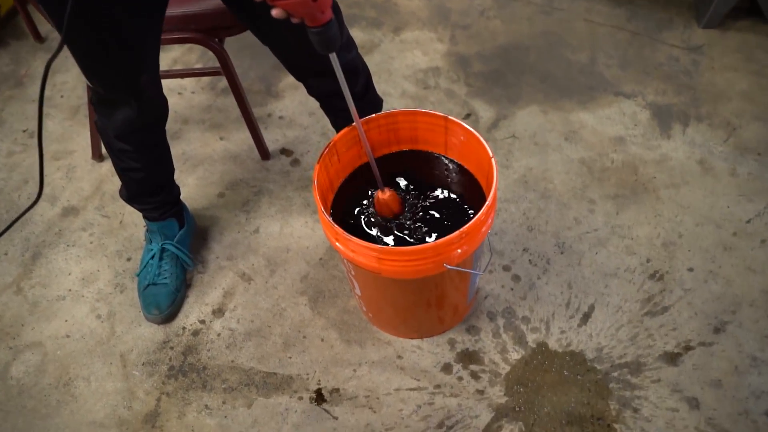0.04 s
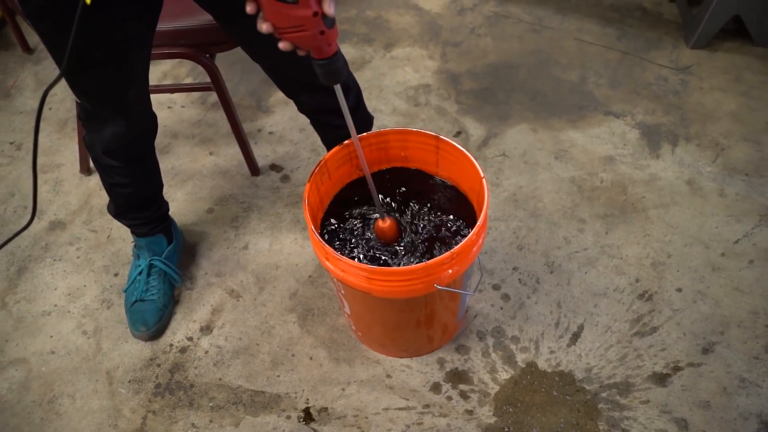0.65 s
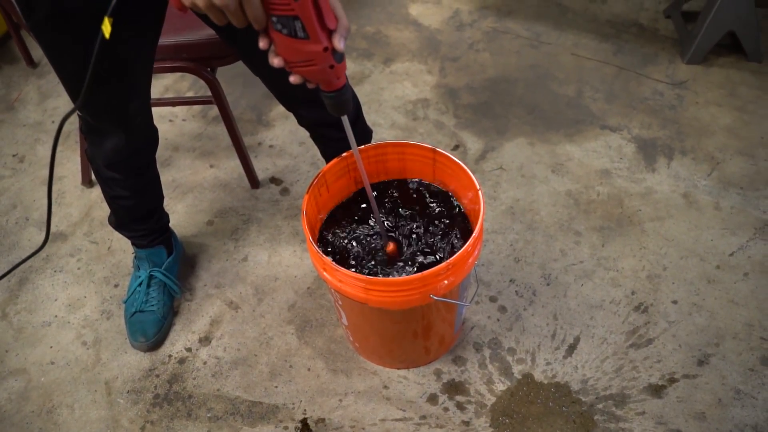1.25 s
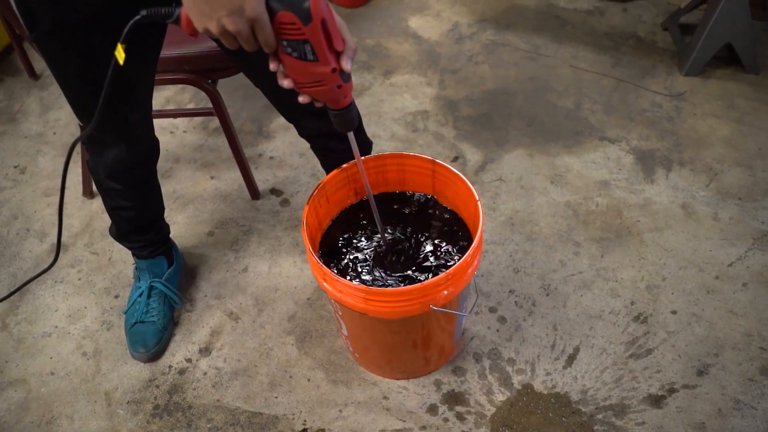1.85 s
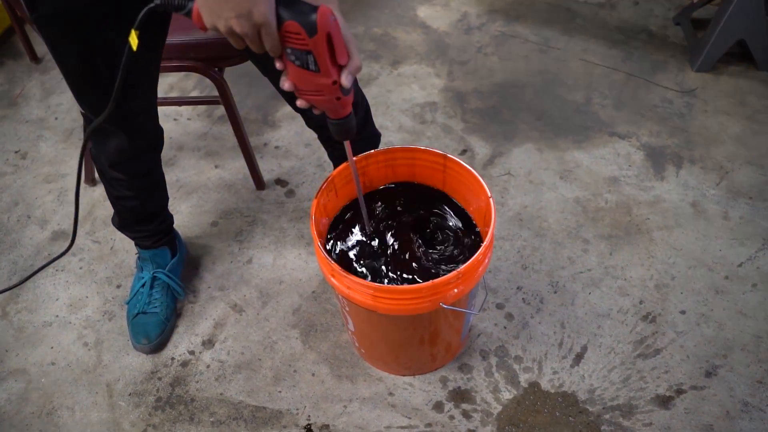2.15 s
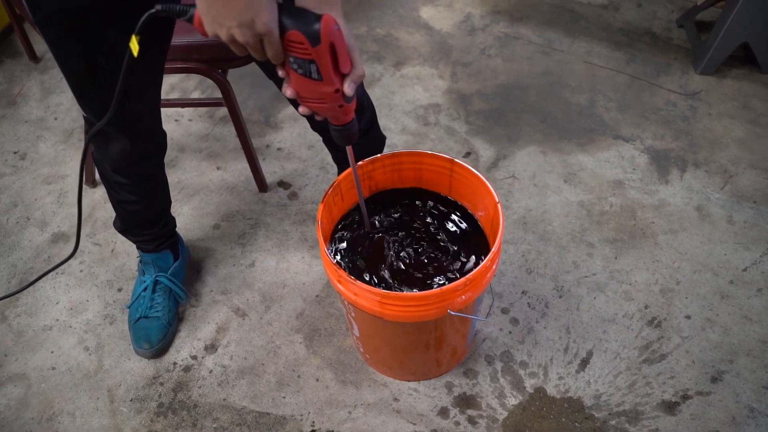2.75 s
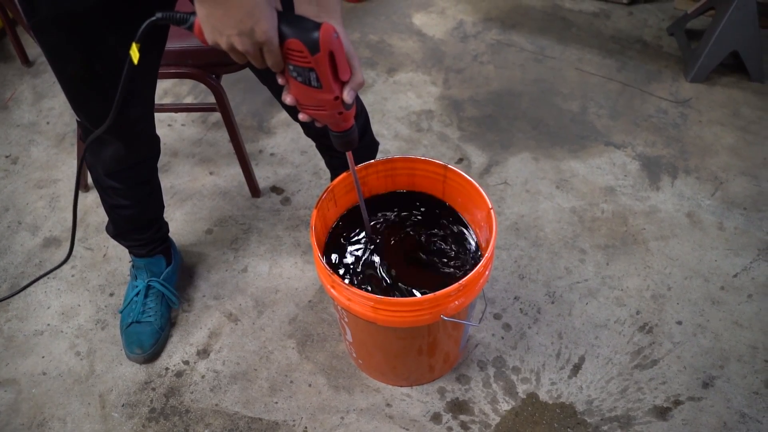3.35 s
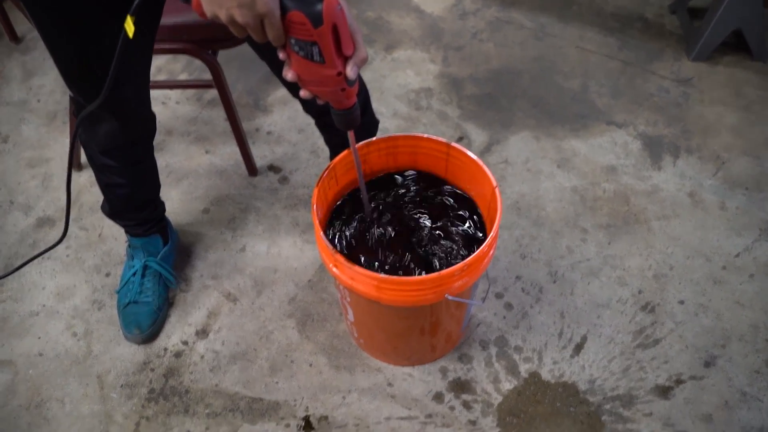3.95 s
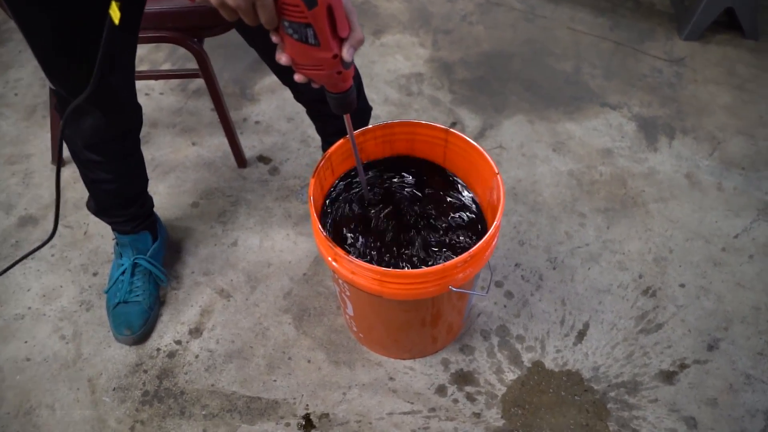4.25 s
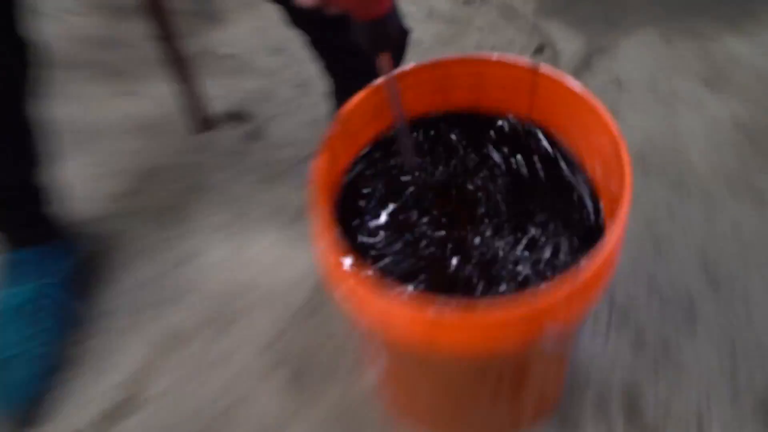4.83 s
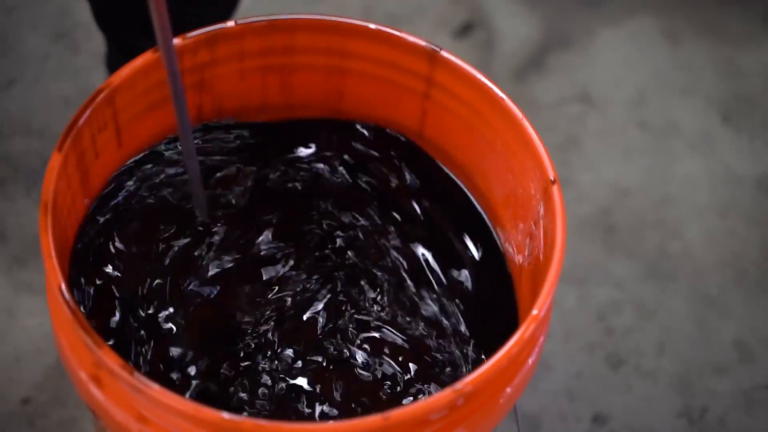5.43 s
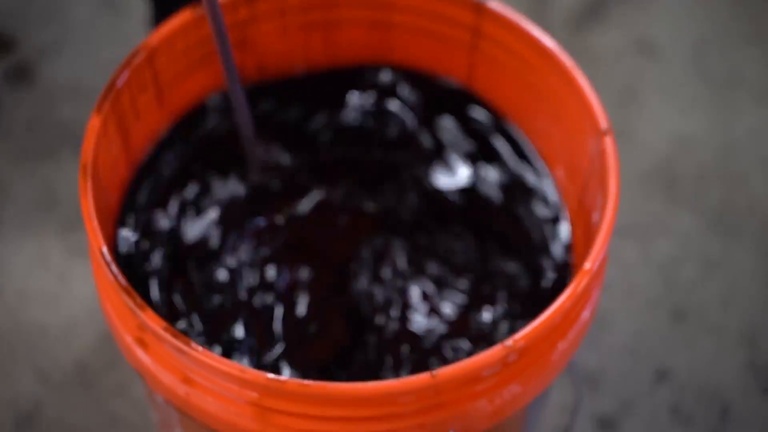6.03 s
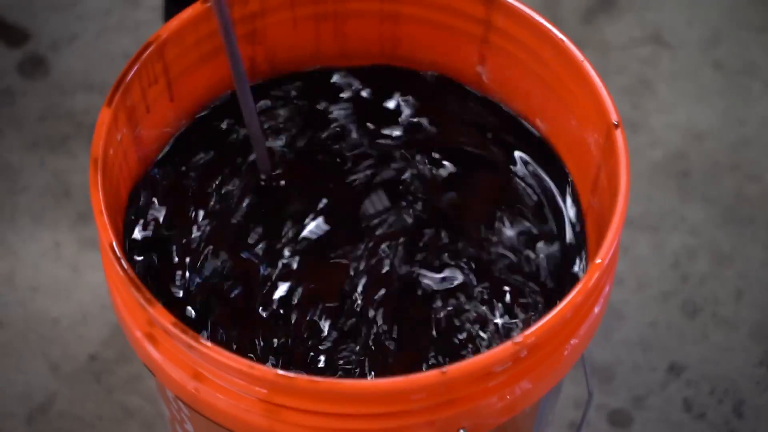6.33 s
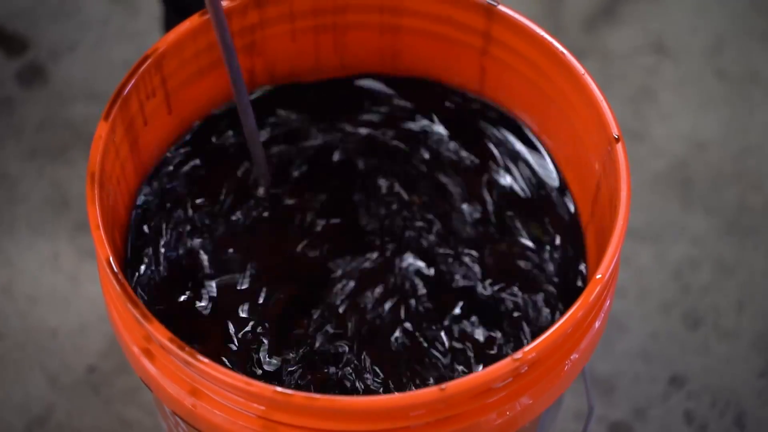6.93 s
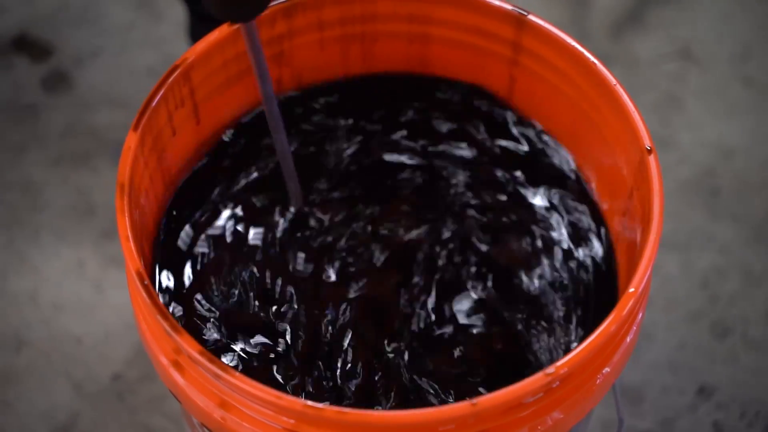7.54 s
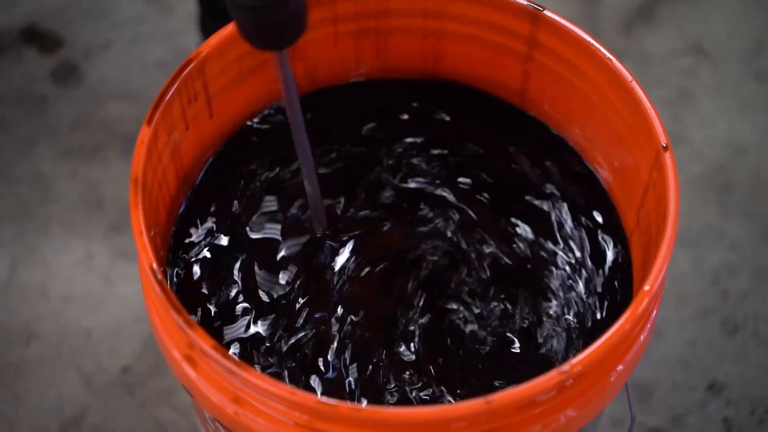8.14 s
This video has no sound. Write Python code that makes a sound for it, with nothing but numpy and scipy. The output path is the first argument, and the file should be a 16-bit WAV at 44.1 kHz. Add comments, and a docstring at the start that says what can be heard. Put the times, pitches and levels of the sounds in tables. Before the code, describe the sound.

Over a low workshop drone, an electric drill whirs at low speed, churning bubbles at the surface of a bucket of liquid. The paddle sinks and the swirl gulps air. The sound then cuts to a faster, louder, brighter whine that wavers in pitch above light frothing. Past the middle the microphone comes closer, with a gulp, a soft handling bump and a brief knock, and the drill keeps running.

```python
"""A corded drill spins a mixing paddle in a plastic bucket of thick liquid, over a low workshop drone.
It starts slowly: gears and motor whine over brush hiss, and the paddle churns bubbles at the surface.
By 1.4 s the paddle sinks and the vortex gulps air. At 2.2 s the sound cuts abruptly to the drill
running faster and louder; it sags and rises with the load. Near 5 s the microphone moves in
over the bucket, with a last gulp, a soft bump and a short knock."""
import sys
import numpy as np
from scipy import signal
from scipy.fft import rfft, irfft, next_fast_len
from scipy.io import wavfile
from scipy.ndimage import uniform_filter1d, map_coordinates

SR = 44100
rng = np.random.default_rng(int(sys.argv[2]) if len(sys.argv) > 2 else 0)


def wrap_up_sound(samples):
    """Save the sound to the file named by the first command line argument, as 16-bit audio."""
    columns = np.atleast_2d(samples).T
    # keep every value between -1 and 1, then stretch to whole-number steps
    tamed = np.clip(columns, -1, 1)
    steps = np.round(tamed * 32767).astype(np.int16)
    wavfile.write(sys.argv[1], SR, steps)


N = 360826
TIME = np.arange(N) / SR
LAYSHAFT_RATIO, PADDLE_RATIO = .228, .0262  # turns per rotor turn
MAINS_HZ, WORKING_HZ = 60, 400

# room drone: f/Hz, relative level/dB
DRONE_SPECTRUM = [(20, -32), (45, -10), (66, -17), (80, 4.5), (90, -8.5), (105, -10.5), (170, -26),
                  (400, -8), (1500, -66)]
# room drone: t/s, relative level/dB
DRONE_ENVELOPE = [(0.0, -57), (1.23, -49.5), (2.44, -57), (2.89, -50), (3.96, -49.5), (4.88, -56.5),
                  (5.6, -64), (5.76, -49), (6.38, -45.5), (6.74, -59), (7.29, -52), (8.18, -55)]
# room field: f/Hz, left-right correlation
STEREO_CORRELATION = [(60, 1), (250, 0.99), (700, 0.96), (1400, 0.89), (2800, 0.66), (5600, 0.9),
                      (9000, 0.25), (14000, 0.37)]
# channel balance: f/Hz, left minus right/dB
STEREO_BALANCE = [(60, 0), (400, 0.2), (1200, -1), (2400, -1), (5000, -1.3), (10000, -1.2), (15000, 1.5)]
# blows on the microphone body: t/s, level before low cut/dB, f/Hz, t60/s
MIC_BUMPS = [(4.67, -27, 90, 0.036), (5.193, -7, 193, 0.012)]
# four high droplet ticks, and a short knock with the bump at 5.2 s: t/s, level/dB, f/Hz, t60/s
TICKS_AND_KNOCK = [(.55, -32, 10500, .03), (1.305, -25, 12400, 0.022), (4.43, -20, 13800, 0.013),
                   (4.72, -28, 12800, .01), (5.185, -16, 860, 0.031)]
# big air pockets in the vortex: f/Hz, relative level/dB
SLOSH_SPECTRUM = [(190, -16), (250, -9), (310, -7), (400, 5)]
# vortex gulps: centre t/s, length/s, lift/dB
VORTEX_GULPS = [(1.274, 1, 13), (2.124, 0.33, 9), (4.985, 0.78, 12.5)]
# bubbles churned in by the blades: f/Hz, relative level/dB
CHURN_SPECTRUM = [(420, -28), (520, -2.5), (605, -4.5), (660, 2), (750, -27.5), (850, -34)]
# splashes and bursting froth: f/Hz, relative level/dB
FROTH_SPECTRUM = [(750, 6), (1100, 0.5), (1600, -1), (3000, -6.5), (6000, -22)]
# rotor speed under load, slow run: t/s, f/Hz
SLOW_SPEED = [(0.0, 173.2), (0.03, 183.6), (0.23, 218.2), (0.52, 241.9), (1.07, 251.4), (1.12, 247.0),
              (1.36, 204.9), (1.78, 249.3), (2.15, 270.1)]
# rotor speed under load, fast run: t/s, f/Hz
FAST_SPEED = [(2.19, 388.6), (2.29, 370.2), (2.46, 357.5), (2.65, 366.7), (3.11, 431.7), (3.81, 477.8),
              (3.94, 480.1), (4.44, 423.7), (4.83, 414.3), (4.96, 384.8), (5.39, 383.8), (5.63, 406.3),
              (6.29, 424.0), (6.41, 420.0), (6.69, 396.0), (7.06, 413.0), (7.23, 394.7), (7.48, 388.6),
              (8.0, 412.9), (8.18, 394.2)]
# once-a-turn hum, fast run: t/s, relative level/dB
HUM_ENVELOPE = [(2.25, -48), (2.31, -37), (4.3, -33), (4.61, -44), (4.73, -38), (5.09, -40.5), (5.6, -34),
                (6.03, -44.5), (6.31, -32.5), (6.39, -40), (6.84, -30.5), (7.01, -34.5), (7.27, -30.5),
                (8.11, -32.5), (8.18, -43)]
# gear, slot and commutator tones: rotor order, relative level/dB, sideband depth, roughness
WHINE_ORDERS = [(3, -28, .5, .3), (4, -17, .5, .15), (5, -21, .9, .3), (6, -21, .8, .25), (7, -28, 1, .5),
                (8, -26, .8, .25), (9, -25.5, .6, .3), (11, -28, .8, .4), (12, -18.6, .45, .2),
                (15, -26.5, .7, .9), (16, -30, .7, .9), (18, -21.5, .6, .3), (19, -32, 1, 1.2),
                (23.5, -30, 1.3, 1.5), (24, -23.8, 1.0, .5), (30, -24, .7, .3), (34, -28, 1.2, .6),
                (36, -24.5, 1.0, .4), (42, -26, 1, .6)]
# housing radiation: f/Hz, relative level/dB
HOUSING_SPECTRUM = [(120, -27), (300, -16.5), (600, -14.5), (1250, -12.5), (1500, -7.5), (1800, -0.5),
                    (2800, 0.5), (3900, -2), (5000, -1.5), (6050, -2), (6600, -8.5), (9900, -9.5),
                    (11800, -18), (15800, -24.5)]
# housing and bucket resonances: f/Hz, width/Hz, far lift/dB, near lift/dB
HOUSING_MODES = [(910, 270, 8, 8.5), (1446, 32, 9, 8), (1735, 34, 4.5, 2), (1915, 54, 4, 0.5),
                 (2060, 204, 6.5, 4), (2140, 150, -3, -3), (2290, 57, 5.5, 0.5), (2590, 74, 3.5, 4.5),
                 (3170, 66, 3.5, 5), (3360, 230, 2.5, -1.5), (3457, 21, 10.5, 11), (4390, 750, 5, 4),
                 (5265, 155, 4.5, 4.5), (5660, 340, 5, -1), (5850, 470, 2.5, 8.5), (7080, 260, 0, 3.5),
                 (8500, 1550, 3.5, 3), (9360, 410, -2, 1), (10400, 990, 3, 0), (13800, 3200, 8.5, 4.5)]


def from_db(db):
    """Decibels to gain."""
    return 10 ** (np.asarray(db) / 20)


def rms_one(x):
    """Scale to unit rms."""
    return x / np.sqrt(np.mean(np.abs(x) ** 2) + 1e-20)


def in_time(points):
    """Curve value at every sample."""
    return np.interp(TIME, *np.transpose(points))


def at_hz(points, hz):
    """Interpolate on a log-frequency axis."""
    knots_hz, values = np.transpose(points)
    return np.interp(np.log(np.maximum(hz, 1)), np.log(knots_hz), values)


def bell(hz, centre_hz, width_hz):
    """Resonance curve, peak 1."""
    return 1 / (1 + (2 * (hz - centre_hz) / width_hz) ** 2)


def drift(rate_hz):
    """Smooth random wander, rms 1."""
    control_hz = 400
    noise = rng.standard_normal(int(N / SR * control_hz) + 800)
    pole = np.exp(-2 * np.pi * rate_hz / control_hz)
    slow = signal.lfilter([1], [1, -2 * pole, pole * pole], noise)[790:]
    return np.interp(TIME * control_hz, np.arange(len(slow)), rms_one(slow))


def coloured(x, gain_at):
    """FFT filter with response gain_at(hz)."""
    size = next_fast_len(N + 4096)
    hz = np.arange(size // 2 + 1) * SR / size
    return irfft(rfft(x, size) * gain_at(hz), size)[..., :N]


def low_cut(x, hz):
    """Second-order high-pass."""
    return signal.sosfilt(signal.butter(2, hz, "high", fs=SR, output="sos"), x)


def ring(clicks, hz, t60_s):
    """Each click starts a damped sine."""
    radius, step = from_db(-60 / (t60_s * SR)), 2 * np.pi * hz / SR
    return signal.lfilter([0, np.sin(step)], [1, -2 * radius * np.cos(step), radius ** 2], clicks + 1e-18)


def taps(rows):
    """One damped tone per light blow."""
    return sum(from_db(db) * ring(signal.unit_impulse(N, round(t_s * SR)), hz, t60_s)
               for t_s, db, hz, t60_s in rows)


def at_surface(start_s=.095, attack_s=.17, sink_s=1.09, release_s=.34):
    """1 with the paddle beating at the surface, 0 when sunk."""
    return np.clip(np.minimum((TIME - start_s) / attack_s, 1 - (TIME - sink_s) / release_s), 0, 1)


def cut_to_fast(start_s=2.165, crossfade_s=.025):
    """0 in the slow run, 1 in the fast run."""
    return np.clip((TIME - start_s) / crossfade_s, 0, 1)


def closeness(start_s=4.62, move_s=.55):
    """Microphone position: 0 far, 1 over the bucket."""
    return np.clip((TIME - start_s) / move_s, 0, 1)


def octaves(rotor_hz):
    """Speed doublings above working speed."""
    return np.log2(rotor_hz / WORKING_HZ)


def room_drone(trim_db=4.5):
    """Low noise, strongest near 80 Hz."""
    noise = coloured(rng.standard_normal(N), lambda hz: from_db(at_hz(DRONE_SPECTRUM, hz)))
    return from_db(in_time(DRONE_ENVELOPE) + trim_db) * rms_one(noise)


def workshop(direct, sway_s=.0005, spread_s=.0043, left_lead_s=17e-6):
    """Mono to stereo: common direct sound; scattered reflections shift as hands and microphone sway."""
    swayed = map_coordinates(direct, [(TIME - sway_s * drift(3)) * SR], order=3, mode="nearest")
    bands_hz = np.linspace(0, SR / 2, 400)
    delays_s = spread_s * rng.exponential(1, len(bands_hz))

    def scatter(hz):
        correlation = np.clip(at_hz(STEREO_CORRELATION, hz), 0, .999)
        phase = -2 * np.pi * np.cumsum(np.interp(hz, bands_hz, delays_s)) * hz[1]
        return np.exp(1j * phase) * np.sqrt((1 - correlation) / (1 + correlation))

    def mic_ports(hz):
        share = np.array([[.5], [-.5]])
        return from_db(at_hz(STEREO_BALANCE, hz) * share) * np.exp(2j * np.pi * hz * left_lead_s * share)

    side = coloured(swayed, scatter)
    return coloured(np.array([direct + side, direct - side]), mic_ports)


def mic_bumps():
    """Handling thumps; the microphone body passes little deep bass."""
    return low_cut(taps(MIC_BUMPS), hz=110)


def bubbles(spectrum, per_s, t60_cycles, spread_db, clump_db, count=24):
    """Bubbles form in clumps, each ringing at one of count pitches; rms 1."""
    sizes = from_db(spread_db * np.minimum(rng.exponential(1, N), 4)) * rng.choice([-1, 1], N)
    clicks = sizes * (rng.random(N) < per_s * from_db(clump_db * drift(10)) / SR)
    pitches_hz = np.geomspace(spectrum[0][0], spectrum[-1][0], count)
    pitch_index = rng.integers(0, count, N)
    rings = sum(from_db(at_hz(spectrum, hz)) * hz * ring(clicks * (pitch_index == k), hz, t60_cycles / hz)
                for k, hz in enumerate(pitches_hz))
    return rms_one(low_cut(rings, .8 * pitches_hz[0]))


def liquid(bucket_hz=612, width_hz=35):
    """The vortex gulps air, churned bubbles ring the bucket's air space, froth bursts on top."""
    gulp_db = sum(db * np.exp(-(2 * (TIME - t_s) / length_s) ** 2) for t_s, length_s, db in VORTEX_GULPS)
    slosh = bubbles(SLOSH_SPECTRUM, per_s=300, t60_cycles=17.3, spread_db=.5, clump_db=-.5)
    churn = bubbles(CHURN_SPECTRUM, per_s=1200, t60_cycles=31, spread_db=1, clump_db=1.5)
    hollow = rms_one(coloured(churn, lambda hz: 1 + 1.5 / (1 + 2j * (hz - bucket_hz) / width_hz)))
    froth = bubbles(FROTH_SPECTRUM, per_s=1600, t60_cycles=14.7, spread_db=0, clump_db=.5)
    return (from_db(-51 + gulp_db) * slosh
            + from_db(-47.5 + 18.5 * at_surface()) * hollow
            + from_db(-37.5 + 6.5 * at_surface()) * froth)


def motor_speed():
    """Rotor speed in Hz: the slow run, then an abrupt jump to the fast one."""
    slow_hz, fast_hz = in_time(SLOW_SPEED), in_time(FAST_SPEED)
    return slow_hz + cut_to_fast() * (fast_hz - slow_hz)


def mains_pulse():
    """One cosine cycle per mains half cycle."""
    return np.cos(2 * np.pi * 2 * MAINS_HZ * TIME)


def tooth_errors(angle, harmonics=5):
    """Uneven gear teeth: a random complex pattern repeating each turn."""
    grid = np.linspace(0, 2 * np.pi, 256)
    orders = np.r_[-harmonics:0, 1:harmonics + 1]
    weights = np.exp(2j * np.pi * rng.random(2 * harmonics)) / np.sqrt(np.abs(orders))
    pattern = rms_one(weights @ np.exp(1j * np.outer(orders, grid)))
    turn = angle / (2 * np.pi) % 1
    return pattern[(turn * (len(grid) - 1)).astype(int)]


def hum(angle, rotor_hz, free_run_hz=447, jitter_rad=.29, ripple=.14):
    """Unbalanced rotor and layshaft shake the tool; motor torque ripples with the mains."""
    surface, fast, lay_angle = at_surface(), cut_to_fast(), LAYSHAFT_RATIO * angle
    once_db = fast * (in_time(HUM_ENVELOPE) - .8) + (1 - fast) * (-57 + 15.5 * surface)
    once = from_db(once_db + 2.5 * drift(21)) * (np.sin(angle) + .091 * np.sin(angle + lay_angle))
    fade_db = .2 * np.maximum(rotor_hz - free_run_hz, 0)
    wall_db = 10.3 * bell(2 * rotor_hz, centre_hz=498, width_hz=23)  # bucket wall resonance
    gear_load = 1 + .37 * (1 - surface) * tooth_errors(lay_angle, harmonics=1)
    twice_db = -40 + 8 * octaves(rotor_hz) - fade_db + 4.5 * surface + wall_db + 3 * drift(29)
    twice = from_db(twice_db) * (np.exp(1j * (2 * angle + jitter_rad * drift(28))) * gear_load).real
    layshaft = from_db(-67.5 + 11 * closeness()) * (np.sin(lay_angle) + np.sin(2 * lay_angle))
    torque = 1 + ripple * mains_pulse()
    return np.sqrt(2) * ((once + twice) * torque + layshaft)


def rattle(angle, blade_db=2, clack_db=-15.5, clacks_per_s=900, split_hz=4200):
    """Brush hiss and gear backlash; the low band surges as each of two blades meets the liquid."""
    paddle_angle = PADDLE_RATIO * angle + .3 * drift(2)
    load_db = blade_db * np.cos(2 * paddle_angle) + .5 * np.cos(paddle_angle) + drift(24)
    hiss = rng.standard_normal(N) * from_db(np.cos(angle))
    clacks = rms_one((rng.random(N) < clacks_per_s / SR) * rng.standard_normal(N))
    noise = hiss + from_db(clack_db) * clacks
    low = signal.sosfiltfilt(signal.butter(2, split_hz, fs=SR, output="sos"), noise)
    return rms_one(low * from_db(load_db) + (noise - low) * from_db(.059 * load_db))


def tone_lift_db(order, rotor_hz):
    """Tone level against speed; gears and slots sing out as the motor runs free."""
    if order < 12:  # gears
        return .3 + .084 * np.maximum(rotor_hz - 442, 0) + 3 * octaves(rotor_hz)
    if order == 12:  # rotor slots
        return .23 + .038 * np.maximum(rotor_hz - 413, 0) + 4 * octaves(rotor_hz)
    if order < 30:  # commutator
        return 3.5 - .6 * closeness() + 6 * octaves(rotor_hz)
    return -.5 - 4.5 * octaves(rotor_hz)  # overtones


def whine(angle, rotor_hz, jitter_rad=.012, flutter_db=2.3, top_hz=11800):
    """Rotor orders, spread into sidebands by the layshaft wheel and roughened by uneven contact."""
    shaken = angle + jitter_rad * drift(8.4)
    tones = 0
    for order, db, sideband_depth, roughness in WHINE_ORDERS:
        contact = roughness * rms_one(drift(70) + 1j * drift(70))
        sidebands = sideband_depth * tooth_errors(LAYSHAFT_RATIO * angle)
        tone = np.exp(1j * order * shaken) * (1 + contact + sidebands)
        level_db = db + tone_lift_db(order, rotor_hz) + flutter_db * drift(11.4)
        tones += np.sqrt(2) * from_db(level_db) * tone.real
    return coloured(tones, lambda hz: 1 / (1 + (hz / top_hz) ** 20))


def housing(hz, near):
    """Resonant shell response, near or far; rms 1."""
    lift_db = sum((near_db if near else far_db) * bell(hz, centre_hz, width_hz)
                  for centre_hz, width_hz, far_db, near_db in HOUSING_MODES)
    return rms_one(from_db(at_hz(HOUSING_SPECTRUM, hz) + lift_db))


def drill(angle, rotor_hz, surge_db=.6, treble_hz=7500):
    """Rattle and whine pulse with the mains and leave the housing, louder and brighter with speed."""
    inside = rms_one(rattle(angle) + whine(angle, rotor_hz)) * from_db(surge_db * mains_pulse())
    far = coloured(inside, lambda hz: housing(hz, near=False))
    near = coloured(inside, lambda hz: housing(hz, near=True))
    shell = far + closeness() * (near - far)
    shell /= np.sqrt(uniform_filter1d(shell ** 2, SR // 3))  # rms 1 over 1/3 s
    treble = coloured(shell, lambda hz: 1 / (1 + (treble_hz / (hz + 1)) ** 8))
    passing_db = 2.5 * np.sin(np.pi * closeness())  # brighter while the microphone moves
    treble_db = 2.8 + 2.5 * octaves(rotor_hz) + passing_db
    level_db = -18.5 + 6.5 * octaves(rotor_hz) + .6 * at_surface()
    return from_db(level_db) * (shell + treble * (from_db(treble_db) - 1))


def scene():
    """One rotor angle drives the whole tool; drone, liquid, ticks, knock and bumps join it."""
    rotor_hz = motor_speed()
    angle = 2 * np.pi * np.cumsum(rotor_hz * (1 + .00152 * drift(6.57))) / SR
    direct = room_drone() + drill(angle, rotor_hz) + hum(angle, rotor_hz) + liquid()
    return workshop(direct) + taps(TICKS_AND_KNOCK) + mic_bumps()


def record(dry):
    """Steep low-pass at 15.6 kHz."""
    return signal.sosfilt(signal.ellip(12, .1, 80, 15600, fs=SR, output="sos"), dry)


dry = scene()
out = record(dry)
wrap_up_sound(out)
```